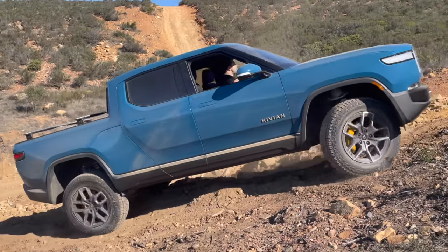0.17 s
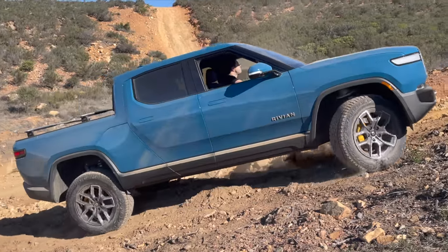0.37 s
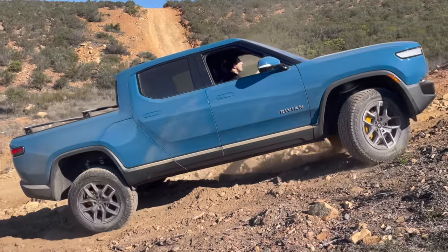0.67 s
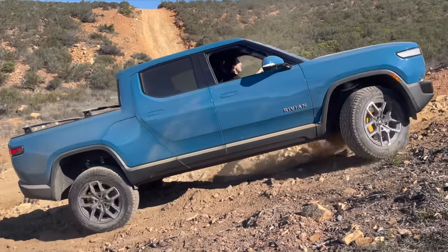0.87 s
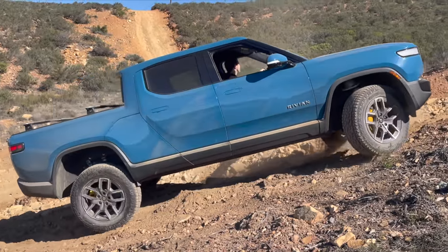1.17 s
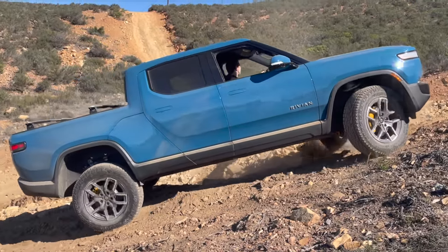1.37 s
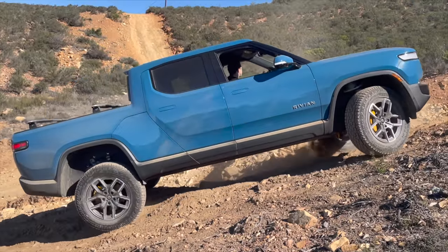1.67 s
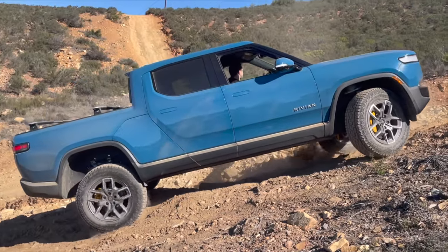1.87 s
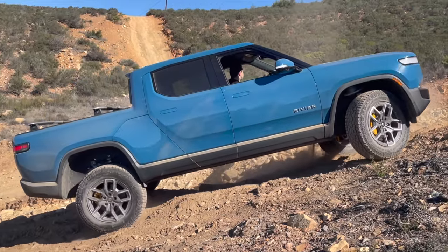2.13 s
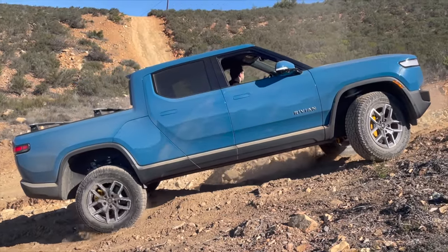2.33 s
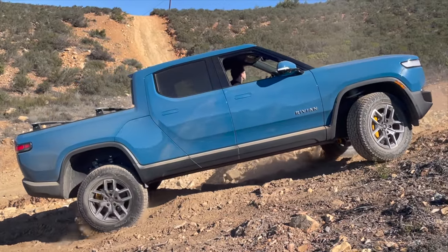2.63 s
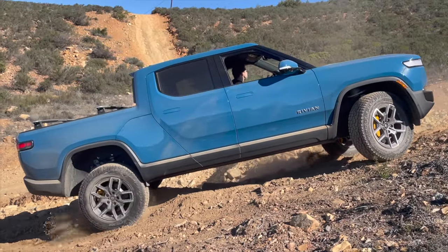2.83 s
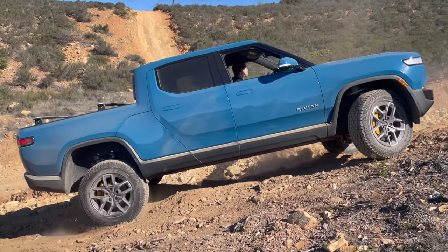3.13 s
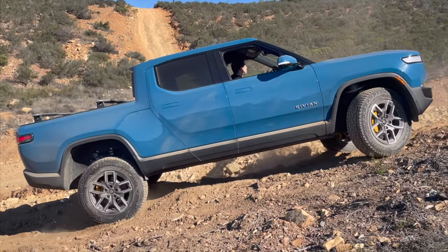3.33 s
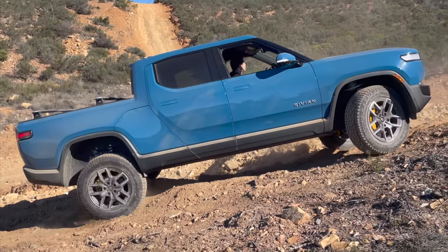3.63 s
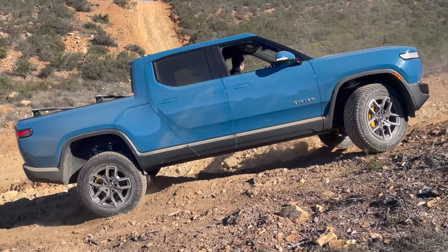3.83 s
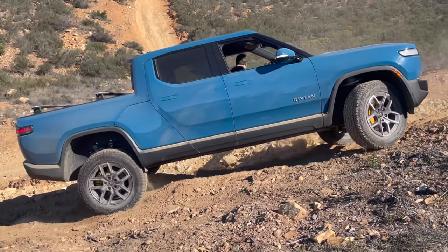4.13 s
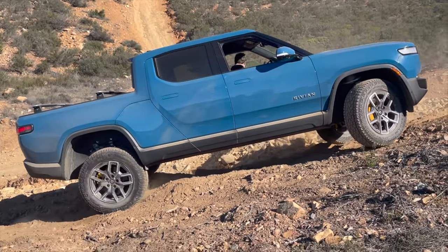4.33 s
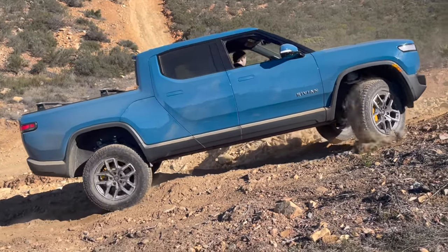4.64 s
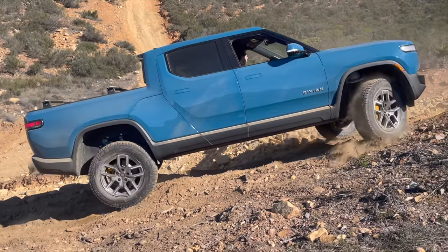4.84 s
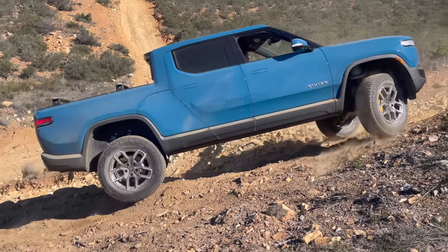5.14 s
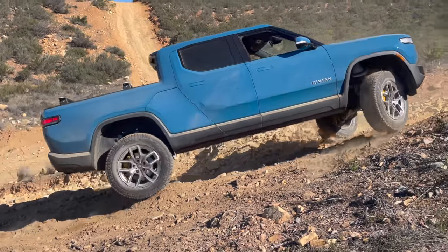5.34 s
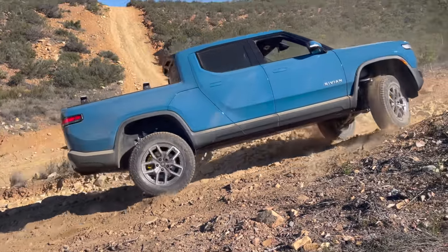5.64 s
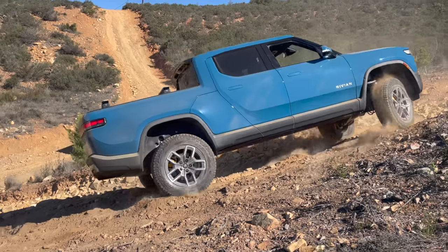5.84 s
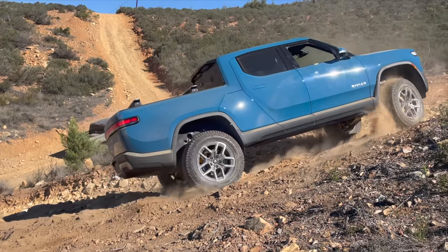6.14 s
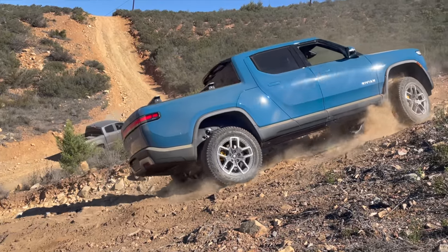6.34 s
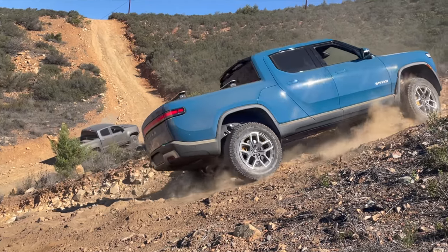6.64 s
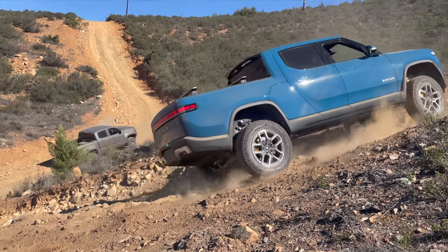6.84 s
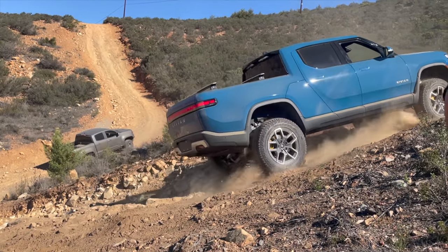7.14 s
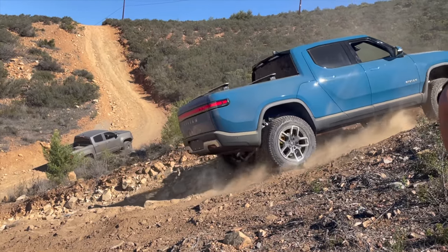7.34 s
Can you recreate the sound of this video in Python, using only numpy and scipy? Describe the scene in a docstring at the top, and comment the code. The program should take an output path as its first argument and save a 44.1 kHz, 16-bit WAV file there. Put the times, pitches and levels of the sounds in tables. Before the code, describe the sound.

An electric truck's tyres crunch and slip over loose rock in uneven surges, stones knocking and cracking above a low rumble and faint thin whine.

```python
"""On a steep trail of loose rock, an electric truck crawls past a few metres away.
In surges its tyres boom at their carcass resonance, shove stones together and grind grit: filtered
noise and streams of tiny damped contacts. Single rocks knock and crack as damped modes and pulses,
stones skid, and one hard chip pings. The motor inverters whine thinly above it: a tone and its octave."""
import sys
import numpy as np
from scipy import signal
from scipy.fft import rfft, irfft, next_fast_len
from scipy.io import wavfile
from scipy.ndimage import uniform_filter1d, map_coordinates

SR = 44100
rng = np.random.default_rng(int(sys.argv[2]) if len(sys.argv) > 2 else 0)


def wrap_up_sound(samples):
    """Save the sound to the file named by the first command line argument, as 16-bit audio."""
    columns = np.atleast_2d(samples).T
    # keep every value between -1 and 1, then stretch to whole-number steps
    tamed = np.clip(columns, -1, 1)
    steps = np.round(tamed * 32767).astype(np.int16)
    wavfile.write(sys.argv[1], SR, steps)


N = 330750

# the wheels slip and grip two or three times a second; levels before each layer's trim:
# start_s, hold_s, boom_db, rocks_db, gravel_db, grit_db
SURGES = [(0.158, 0.12, -33.5, -31.5, -45, -51.5), (0.53, 0.26, -36, -41.5, -46, -54),
          (1.064, 0.17, -38, -37.5, -45, -53.5), (1.705, 0.14, -36, -33.5, -39.5, -48.5),
          (2.176, 0.12, -28.5, -30.5, -38, -48.5), (2.569, 0.11, -33, -25.5, -37, -56),
          (2.964, 0.18, -30, -29.5, -40, -49.5), (3.468, 0.18, -25, -31, -37.5, -51.5),
          (3.772, 0.2, -30, -33.5, -42.5, -51.5), (4.035, 0.31, -54, -33, -43.5, -53.5),
          (4.555, 0.1, -21.5, -28, -34, -42.5), (4.71, 0.25, -44, -41.5, -49.5, -52.5),
          (5.263, 0.24, -28.5, -34.5, -42, -53.5), (5.565, 0.27, -36.5, -38.5, -45, -53.5),
          (5.974, 0.17, -28.5, -31.5, -40, -49), (6.56, 0.27, -48, -44, -55, -54),
          (6.885, 0.14, -30.5, -29, -40, -49.5), (7.094, 0.15, -34, -39, -47, -50.5),
          (7.47, 0.043, -26.5, -31, -37, -46)]
SURGE_RELEASE_S = 0.033  # the amplitude falls by a factor e


def load(pressure_db):
    """Powers of independent sources add: surges of load on a slow creep give four layer levels in dB."""
    attack_s, crest_db = 0.06, 1.5  # a surge crests halfway through its hold
    carcass_lag_s, carcass_release_s = 0.019, 0.013  # the tyres answer late
    # level at mean pressure plus dB per dB of pressure; the grit does not follow the pressure
    boom = amp(-35.5 + 1.33 * pressure_db) ** 2
    creep_rocks_db = -40 + 1.18 * pressure_db
    creep_gravel_db = -49 + 0.66 * pressure_db
    ground = amp([creep_rocks_db, creep_gravel_db, np.full(N, -55)]) ** 2
    for s, hold, boom_db, *ground_db in SURGES:
        boom += amp(boom_db) ** 2 * swell(s + carcass_lag_s, attack_s, hold, carcass_release_s, crest_db)
        surge = swell(s, attack_s, hold, SURGE_RELEASE_S, crest_db)
        ground += np.outer(amp(ground_db) ** 2, surge)
    uneven_db = 1.47 * wobble(rate=30)  # the stony ground makes the load waver
    return 10 * np.log10([boom, *ground]) + uneven_db


def tyres(boom_db):
    """Forced resonance: rough ground, as noise, shakes the tyre carcasses at their low resonance."""
    # carcass spectrum: frequency_hz, relative_db
    boom_spectrum = [(20, -51.5), (32, -21), (45, -10), (58, 2.5), (68, 3.5), (82, 4), (98, -5.5),
                     (130, -9.5), (250, -70.5)]
    return amp(boom_db - 1.0) * steady(colour(noise(side_db=-26.5), boom_spectrum), seconds=0.13)


def bounces():
    """Free resonance: a tyre that drops off a rock rings on the note of its carcass."""
    # drops: time_s, level_db
    drops = [(0.032, -26.5), (0.79, -34), (0.97, -32.5), (1.11, -27), (1.838, -24.5), (2.737, -21),
             (2.97, -26), (3.182, -21), (3.31, -27), (3.71, -19.5), (3.99, -26), (4.352, -19.5),
             (4.92, -32.5), (5.42, -22), (6.1, -25), (6.223, -25), (6.5, -31.5), (6.965, -25.5),
             (7.015, -19.5)]
    carcass_hz, attack_s, release_s = 69.56, 0.024, 0.041
    t = np.arange(N) / SR
    track = np.zeros(N)
    for s, db in drops:
        envelope = np.sqrt(2 * swell(s, attack_s, 0, release_s))  # 2: the level is an rms value
        hz = carcass_hz * (1 + .05 * rng.normal())
        track += amp(db) * envelope * np.sin(2 * np.pi * hz * t)
    return track


def rocks(rocks_db):
    """Damped contact: buried rocks shift under the tread with dull bumps, among the noise of the soil."""
    # spectrum of the buried rocks: frequency_hz, relative_db
    rock_spectrum = [(60, -52.5), (90, 3), (112, 2.5), (145, -1), (190, 1), (255, -2.5), (310, -6.5),
                     (380, -4.5), (500, -12.5), (700, -28.5), (1100, -20), (2500, -64)]
    bumps = contacts(count=3333, spread_db=1.9, width_db=4, lo_hz=100, hi_hz=800, cycles=6, size=1500)
    soil = amp(-3) * noise(side_db=-15)
    return amp(rocks_db) * steady(colour(bumps + soil, rock_spectrum), seconds=0.065)


def gravel(gravel_db):
    """Granular friction: pebbles grind together; under more load small ones add a brighter rasp."""
    # crunch of the larger stones: frequency_hz, relative_db
    crunch_spectrum = [(250, -7), (550, 0.5), (780, 0.5), (970, 4.5), (1250, -6), (1550, -7.5), (1850, -32),
                       (2500, -29), (4000, -30), (7000, -49), (14000, -49)]
    # small pebbles slipping: frequency_hz, relative_db
    pebble_spectrum = [(600, -39.5), (1200, 16), (1600, -11), (2500, -1), (3400, -16), (5000, -4),
                       (8000, -13), (14000, -36)]
    clusters = collapses(count=700)
    clacks = contacts(count=10000, spread_db=3.0, width_db=8, lo_hz=500, hi_hz=2200, cycles=6, size=500)
    grains = clacks + amp(-5) * noise(side_db=-10)
    crunch = steady(colour(clusters * grains, crunch_spectrum), seconds=.09)
    slips = contacts(count=8250, spread_db=3.6, width_db=8, lo_hz=1300, hi_hz=4500, cycles=13, size=350)
    rasp = steady(colour(clusters * slips, pebble_spectrum), seconds=0.47)
    overload_db = gravel_db - np.mean(gravel_db)
    rasp_db = gravel_db - 14.0 + 0.024 * overload_db  # grows a little faster than the crunch
    return amp(gravel_db - 1.5) * crunch + amp(rasp_db) * rasp


def collapses(count):
    """Relaxation: gain of a gravel bed that gives way in clusters, each sudden and then dying away."""
    settle_s, spread_db, even_share = .005, 2.4, .4  # even_share: steady part of the grinding power
    when, force = rng.random((count, 2)).T
    power = np.bincount((when * N).astype(int), amp(spread_db * rare_strength(force)) ** 2, N)
    power = signal.lfilter([1], [1, -np.exp(-1 / (settle_s * SR))], power)
    return np.sqrt(even_share + (1 - even_share) * power / np.mean(power))


def grit(grit_db):
    """Broadband friction: sand hisses under the rubber, and tiny chips tick in it."""
    # spectrum of the spray: frequency_hz, relative_db
    grit_spectrum = [(700, 5), (1600, 5.5), (2500, 1), (4000, -4.5), (5500, -7), (7200, -9.5), (8300, -20),
                     (9800, -8.5), (12500, -20), (14200, -15.5), (16000, -21)]
    ticks = contacts(count=6000, spread_db=4.6, width_db=8, lo_hz=2000, hi_hz=9000, cycles=9, size=200)
    sand = noise(side_db=-12) * amp(1.5 * wobble(30))
    spray = sand + amp(-6) * ticks
    return amp(grit_db - 0.5) * unit(colour(spray, grit_spectrum))


def knocks():
    """Modal impact: a tipping rock clacks at its pitch and thuds into damping soil; crumbs scatter."""
    # rocks tipping under a tyre, levels before trim: time_s, thud_db, thud_hz, clack_db, clack_hz
    tipping_rocks = [(0.166, -28, 409, -28, 630), (0.251, -26, 388, -42, 900), (0.326, -30, 328, -29, 700),
                     (0.631, -34, 600, -26, 1076), (0.638, -32, 480, -29, 840), (0.788, -42, 300, -32, 915),
                     (1.063, -23, 431, -27, 770), (1.221, -22, 339, -46, 900), (1.265, -26, 300, -44, 900),
                     (1.391, -42, 300, -33, 750), (1.526, -34, 700, -22, 900), (1.533, -29, 280, -38, 760),
                     (1.714, -38, 300, -29, 775), (1.741, -24, 258, -38, 900), (1.994, -16, 425, -28, 990),
                     (2.006, -22, 345, -43, 900), (2.074, -24, 247, -35, 620), (2.101, -36, 291, -27, 860),
                     (2.137, -36, 300, -25, 830), (2.268, -23, 215, -27, 660), (2.439, -40, 300, -30, 890),
                     (2.47, -25, 253, -40, 900), (2.527, -36, 300, -28, 980), (2.588, -20, 242, -34, 900),
                     (2.62, -21, 236, -34, 900), (2.634, -22, 260, -32, 900), (2.655, -21, 215, -40, 900),
                     (2.672, -20, 400, -26, 850), (2.685, -22, 215, -40, 620), (2.857, -23, 231, -40, 900),
                     (3.047, -22, 334, -22, 1150), (3.058, -17, 226, -32, 900), (3.074, -18, 226, -36, 900),
                     (3.104, -22, 215, -38, 900), (3.233, -21, 355, -35, 900), (3.346, -23, 345, -36, 620),
                     (3.441, -32, 280, -27, 900), (3.451, -24, 260, -23, 936), (3.501, -23, 240, -22, 936),
                     (3.515, -20, 236, -36, 900), (3.53, -21, 204, -24, 850), (3.539, -27, 328, -19.5, 990),
                     (3.701, -32, 280, -25, 1010), (3.776, -28, 587, -21, 800), (3.793, -34, 300, -27, 830),
                     (3.811, -23, 247, -36, 900), (3.855, -18, 230, -15.5, 968),
                     (3.875, -18, 258, -40, 900), (3.909, -35, 565, -22, 820), (3.918, -32, 260, -23, 1010),
                     (3.961, -25, 554, -18, 968), (4.045, -26, 269, -25, 936), (4.109, -22, 236, -38, 900),
                     (4.124, -33, 280, -26, 958), (4.21, -30, 240, -28, 1010), (4.307, -29, 205, -25, 850),
                     (4.511, -30, 250, -28, 1000), (4.532, -32, 300, -24, 1000),
                     (4.573, -21, 279, -25, 950), (4.589, -14, 230, -32, 900), (4.619, -21, 199, -17, 958),
                     (4.642, -24, 260, -26, 1100), (4.688, -21, 221, -36, 900), (4.834, -18, 340, -36, 900),
                     (4.865, -38, 300, -28, 753), (5.179, -45, 300, -34, 936), (5.221, -38, 300, -28, 947),
                     (5.326, -30, 260, -28, 818), (5.454, -25, 296, -21, 1300), (5.465, -24, 240, -29, 936),
                     (5.588, -36, 300, -28, 872), (5.602, -18, 210, -38, 900), (5.775, -33, 226, -25, 807),
                     (5.952, -22, 366, -38, 900), (6.038, -24, 361, -37, 900), (6.073, -20, 330, -30, 900),
                     (6.128, -32, 260, -28, 904), (6.415, -45, 344, -33, 1400), (6.427, -29, 344, -44, 900),
                     (6.57, -29, 366, -37, 690), (6.615, -35, 420, -29, 1012), (6.723, -25, 400, -27, 807),
                     (6.865, -26, 409, -30, 624), (6.897, -24, 474, -32, 1000),
                     (6.903, -34, 400, -26, 1440), (6.938, -24, 431, -36, 900), (6.975, -18, 460, -24, 650),
                     (6.993, -16, 237, -22, 800), (7.129, -30, 595, -28, 700), (7.308, -28, 395, -38, 764),
                     (7.327, -31, 204, -46, 900), (7.44, -21, 345, -23, 979), (7.472, -22, 409, -34, 900)]
    # modes of a rock: pitch_multiple, relative_db, t60_s
    stone_modes = [(.72, -7, 0.011), (1, 0, 0.022), (1.33, -12, 0.009), (2.2, -12, 0.006)]
    # contact and crumbs: frequency_hz, relative_db
    clack_spectrum = [(150, -16), (500, -4), (750, -1), (980, 0), (1300, -5), (1900, -11), (2600, -13),
                      (3600, -25), (8000, -50)]
    thud_trim_db, clack_trim_db, contact_trim_db, crumbs_trim_db = 0.5, -3, 11, -15
    rings, crumbs = np.zeros((2, 2, N))
    t = np.arange(SR // 10) / SR
    for s, thud_db, thud_hz, clack_db, clack_hz in tipping_rocks:
        damping = amp(-60 * thud_hz * t / 12)  # 60 dB in 12 cycles
        thud = np.sin(2 * np.pi * thud_hz * t) * damping * (1 - np.exp(-(t / .0007) ** 2))
        clack = np.zeros(len(t))
        for multiple, level_db, t60 in stone_modes:
            mode_hz = clack_hz * multiple * (1 + .025 * rng.normal())
            clack += amp(level_db - 60 * t / t60) * np.sin(2 * np.pi * mode_hz * t)
        clack *= 1 - np.exp(-t / .0003)
        contact = signal.unit_impulse(len(t))
        scatter = noise(side_db=1, size=len(t)) * amp(-60 * t / 0.037)
        add(rings, s - .001, amp(thud_db + thud_trim_db) * thud)
        add(rings, s, amp(clack_db + clack_trim_db) * clack)
        add(crumbs, s, amp(clack_db + contact_trim_db) * contact)
        add(crumbs, s, amp(clack_db + crumbs_trim_db) * scatter)
    return rings + colour(crumbs, clack_spectrum)


def cracks():
    """Brittle fracture: a pinched stone breaks in a pulse and a burst of fragments with a short tail."""
    # snapping stones, levels before trim: time_s, snap_db, splinter_db (added to snap_db), t60_s
    snapping_stones = [(0.4713, -24, -4.5, 0.0057), (0.5282, -19.5, -10, 0.004), (0.5324, -31, -3, 0.0099),
                       (0.5384, -30, 0, 0.0019), (0.5484, -28, -15, .012), (0.5731, -24, -16, 0.0045),
                       (0.592, -28, -16, .012), (0.6282, -13, -3.5, 0.0042), (0.668, -37, -22, .008),
                       (0.6978, -26.5, -3.5, 0.0037), (0.7846, -29, -39, 0.02), (0.832, -32, -30, 0.005),
                       (1.1044, -31.5, -3.5, 0.016), (1.196, -35, -10, .015), (1.288, -28, -15, 0.03),
                       (1.3423, -30.5, -3, 0.053), (1.3795, -37, -16, .006), (1.5245, -30, -35, 0.012),
                       (1.6974, -31.5, -8, 0.0079), (1.9021, -31, -33, 0.0036), (2.0695, -35, -25, .004),
                       (2.136, -29, -21, 0.015), (2.2334, -32, -20, .005), (2.3273, -34, -16, .004),
                       (2.3431, -28.5, -13, 0.0046), (2.3574, -33, -3, 0.0036), (2.3655, -28, -8, .005),
                       (2.4655, -34, -22, .004), (2.4885, -33, -4, 0.005), (3.0939, -32, -15, 0.0028),
                       (3.1472, -31, -14, 0.004), (3.7744, -31.5, -9, .005), (3.7923, -30, -10, .004),
                       (3.8541, -30, -16, 0.0045), (3.908, -30, -25, 0.0036), (3.9598, -31, -20, 0.004),
                       (4.1604, -38, 3.5, 0.0058), (4.4667, -28, -11, 0.01), (4.5015, -32, -22, .006),
                       (4.5105, -30, -22, .006), (4.5306, -19, -14, 0.006), (4.5734, -23, -7.5, 0.0027),
                       (4.6414, -29, -4, .005), (4.8145, -23.5, -10.5, 0.0018), (4.9511, -31, -18, 0.005),
                       (5.0988, -29.5, -10, 0.0042), (5.1878, -31, -8, 0.0037), (5.215, -26, -1.5, 0.0019),
                       (5.248, -28, -21, 0.0058), (5.3522, -30, -12, 0.004), (5.4343, -31, -28, .004),
                       (5.451, -24, -24, .004), (5.4538, -17.5, -28, 0.012), (5.4753, -30, -20, .004),
                       (5.5218, -21.5, -31, 0.0026), (5.5334, -29, -14, 0.006), (5.5687, -31, -16, 0.006),
                       (5.671, -34.5, -11, .008), (6.0893, -30, -30, .015), (6.2198, -35, -9, 0.0064),
                       (6.4138, -35, -35, 0.008), (6.6405, -35, -31, .005), (6.7221, -35, 0, .008),
                       (6.9915, -27, -32, .007)]
    # body of a snap: frequency_hz, relative_db
    snap_spectrum = [(200, -6), (700, 7), (1400, 3.5), (2700, 5), (4200, 1.5), (6000, -1), (8500, -9),
                     (16000, -63)]
    # its treble: frequency_hz, relative_db
    splinter_spectrum = [(1500, -101), (4500, -103), (7000, 21), (8400, 37.5), (10000, 32.5), (12500, 25),
                         (16000, 28)]
    fracture_share, fracture_s = 0.58, 0.0068  # the clean break loses energy share as snaps lengthen
    snaps, splinters = np.zeros((2, 2, N))
    t = np.arange(SR // 10) / SR
    tail = amp(-15 - 60 * t / .05)  # scattered by the ground
    for s, snap_db, splinter_db, t60 in list(snapping_stones) + chips(count=2):
        clean = np.clip(fracture_share * np.exp(-t60 / fracture_s), 0, 1)
        pan_db = np.array([[1], [-1]]) * rng.uniform(-0.62, 1)
        pulse = unit(signal.unit_impulse(len(t))) * amp(pan_db)
        fragments = unit(noise(side_db=-19, size=len(t)) * (amp(-60 * t / t60) + tail))
        burst = np.sqrt(clean) * pulse + np.sqrt(1 - clean) * fragments
        add(snaps, s + 0.0014, amp(snap_db - 27.5) * burst)
        add(splinters, s + 0.0012, amp(snap_db + splinter_db - 22.5) * burst)
    return colour(snaps, snap_spectrum) + colour(splinters, splinter_spectrum)


def chips(count):
    """Random fracture under load: faint snaps during each surge, as rows for cracks()."""
    middle_db, spread_db, splinter_db, t60 = -40, 4, -18, .004
    rows = []
    for s, hold, *_ in SURGES:
        for place, force in rng.random((count, 2)):
            when = s + place * (hold + 2 * SURGE_RELEASE_S)
            rows.append((when, middle_db + spread_db * (2 * force - 1), splinter_db, t60))
    return rows


def scrapes():
    """Stick-slip: a stone skidding under the tread moves in irregular jerks that excite its resonance."""
    # skids: start_s, level_db, length_s, pitch_hz, width_hz
    skids = [(0.155, -37.5, 0.088, 370, 380), (0.573, -41, 0.034, 790, 500),
             (1.074, -43.5, 0.026, 2520, 400), (1.093, -46.5, 0.02, 3150, 1800),
             (1.105, -46, 0.025, 2650, 600), (1.16, -36.5, 0.074, 394, 500), (2.575, -54, 0.07, 2500, 1800),
             (2.605, -35, 0.036, 380, 340), (3.026, -49, 0.029, 2500, 1500),
             (3.762, -44, 0.0098, 2030, 500), (4.071, -49.5, 0.14, 4870, 2970),
             (4.536, -55, 0.016, 3000, 2200), (4.555, -44, 0.029, 3200, 3030),
             (4.616, -50.5, 0.038, 2390, 2000), (5.45, -30, 0.012, 2000, 2290),
             (5.949, -46, 0.059, 1960, 1490), (6.066, -44, 0.025, 1940, 1250),
             (6.593, -45.5, 0.054, 1210, 700), (6.864, -37.5, 0.049, 960, 950),
             (6.95, -32.5, 0.036, 250, 254), (6.969, -41.5, 0.035, 2200, 1750),
             (7.474, -46, 0.026, 3880, 1400)]
    track = np.zeros((2, N))
    for s, db, length, hz, width_hz in skids:
        jerks = rng.standard_normal(int(length * SR)) ** 3  # cubing makes the strong ones stand out
        band = [max(hz - width_hz / 2, hz / 4), hz + width_hz / 2]
        stone = signal.butter(2, band, "bandpass", fs=SR)
        skid = unit(signal.lfilter(*stone, jerks))
        add(track, s, amp(db) * skid * np.hanning(len(jerks)) ** .5)
    return track


def pings():
    """Free vibration: a hard chip rings briefly on one lightly damped mode."""
    # ringing chips: time_s, level_db, pitch_hz, t60_s
    ringing_chips = [(4.816, -25, 11930, 0.0083)]
    track, t = np.zeros((2, N)), np.arange(SR // 10) / SR
    for s, db, hz, t60 in ringing_chips:
        add(track, s, amp(db) * np.sin(2 * np.pi * hz * t) * amp(-60 * t / t60))
    return track


def inverters():
    """Switching harmonics: the tone swells with motor torque, its octave comes and goes; both flutter."""
    # pushes of the motors: start_s, hold_s, tone_db
    torque = [(0.08, 0.018, -51.5), (0.14, .025, -57), (0.21, 0.018, -59), (0.367, 0.025, -59),
              (0.432, .025, -55), (0.504, .03, -56), (0.665, 0.043, -56.5), (0.752, .07, -63),
              (0.89, 0.23, -61.5), (1.23, 0.12, -70), (1.514, 0.052, -61), (1.707, 0.48, -67),
              (2.114, .19, -63), (2.55, 0.12, -68), (2.887, 0.12, -59), (3.07, 0.07, -77),
              (3.617, 0.09, -66), (3.98, 0.36, -66.5), (4.456, 0.093, -55.5), (4.69, 0.048, -54),
              (4.753, 0.031, -56), (4.85, 0.1, -65), (4.94, 0.23, -56.5), (5.29, 0.062, -67),
              (5.43, 0.073, -57), (5.58, .04, -64), (6.007, 0.039, -63), (6.143, 0.2, -63),
              (6.58, 0.11, -61.5), (6.716, 0.035, -53), (6.83, 0.07, -63), (6.983, 0.14, -57.5),
              (7.21, .04, -61), (7.38, 0.088, -55.5)]
    # level of the octave: time_s, level_db
    octave_levels = [(0, -70), (1.6, -98), (1.75, -85), (2.0, -88), (2.55, -64.5), (2.65, -75), (3.08, -65),
                     (3.25, -85), (3.42, -88), (3.62, -67.5), (3.98, -75), (4.2, -67), (4.47, -72),
                     (4.65, -66), (5.12, -73), (5.22, -71), (5.38, -68), (5.7, -85), (6.6, -93),
                     (7.12, -68), (7.5, -70)]
    switching_hz, idle_db = 4993, -67  # idle_db: the tone between pushes
    attack_s = release_s = 0.012
    power = amp(idle_db) ** 2
    for s, hold, db in torque:
        power = power + amp(db) ** 2 * swell(s, attack_s, hold, release_s)
    # the motors ease off and the whine dips by 12 dB
    easing = amp(-12 * swell(6.365, attack_s, .18, release_s))
    octave_db, = curves(octave_levels)
    phase = 2 * np.pi * switching_hz * np.arange(N) / SR
    flutter_db = 2.2 * wobble(50) + 1.2 * wobble(18)
    tone = unit(np.sin(phase + .8 * wobble(36)) * amp(flutter_db))
    octave = unit(np.sin(2 * phase + 1.2 * wobble(40)) * amp(1.5 * wobble(60)))
    sided_tone = tone * amp([[1], [-1.5]])  # dB at left and right
    return easing * (np.sqrt(power) * sided_tone + amp(octave_db) * octave)


def echoed(x):
    """Specular reflection: the truck's flank throws each blow back, later and weaker."""
    echo_s, echo_db = 0.0081, -18.5
    return x + amp(echo_db) * np.pad(x, ((0, 0), (round(echo_s * SR), 0)))[:, :N]


def contacts(count, spread_db, width_db, lo_hz, hi_hz, cycles, size):
    """Shot noise of damped contacts: each has its pitch, force and place, and dies in a few cycles."""
    when, pitch, force, place = rng.random((count, 4)).T
    hz = (lo_hz * (hi_hz / lo_hz) ** pitch)[:, None]
    turns = hz * np.arange(size) / SR
    strength = amp(spread_db * rare_strength(force)) * (-1) ** np.arange(count)
    decay = np.exp(-np.log(1000) * turns / cycles)  # 60 dB in the given cycles
    grains = strength[:, None] * hz * np.sin(2 * np.pi * turns) * decay
    index = ((when * N).astype(int)[:, None] + np.arange(size)).ravel()
    pan_db = width_db * (place[:, None] - .5)
    ears = [np.bincount(index, (grains * amp(ear * pan_db)).ravel(), N)[:N] for ear in (1, -1)]
    return unit(np.array(ears))


def rare_strength(force):
    """Exponential statistics: uniform draws become mostly weak, rarely strong events, capped at log 20."""
    return np.minimum(-np.log(1 - force), np.log(20))


def swell(s, attack, hold, release, crest_db=0):
    """Exponential growth and decay: power rises up to time s, holds with a crest halfway, dies away."""
    first, last = np.clip(np.array([s - 10 * attack, s + hold + 10 * release]) * SR, 0, N).astype(int)
    t = np.arange(first, last) / SR - s
    edges = np.maximum(-t, 0) / attack + np.maximum(t - hold, 0) / release
    arch = np.sin(np.pi * np.clip(t / max(hold, 1 / SR), 0, 1)) - 2 / np.pi
    return np.pad((np.exp(-edges) * amp(crest_db * arch)) ** 2, (first, N - last))


def steady(x, seconds):
    """Level normalisation: even out slow swells by the running power, so that the load sets the level."""
    power = uniform_filter1d(np.mean(x ** 2, axis=0), int(seconds * SR) + 1)
    return x / np.sqrt(np.abs(power) + 1e-9)


def colour(x, spectrum, size=8192):
    """Minimum-phase filtering: a causal response of energy 1 with the shape of a spectrum."""
    cepstrum = irfft(np.log(amp(along(spectrum, np.fft.rfftfreq(size, 1 / SR)))))
    cepstrum[1:size // 2] *= 2  # folding the cepstrum makes the response causal
    cepstrum[size // 2 + 1:] = 0
    response = irfft(np.exp(rfft(cepstrum)))
    return signal.fftconvolve(x, response[None] / np.linalg.norm(response), axes=1)[:, :N]


def noise(side_db, size=N):
    """Partial coherence: white stereo noise whose side part lies side_db from the common part."""
    mid, side = rng.standard_normal((2, size))
    return unit(mid + amp(side_db) * np.array([side, -side]))


def wobble(rate):
    """Band-limited fluctuation: a smooth random curve with rate knots a second."""
    knots = rng.standard_normal(int(N * rate / SR) + 4)
    return map_coordinates(knots, [np.arange(N) * rate / SR])


def curves(rows):
    """Linear interpolation in time: one value per sample for each column after the time."""
    s, *cols = np.transpose(rows)
    return [np.interp(np.arange(N) / SR, s, c) for c in cols]


def along(points, hz):
    """Logarithmic frequency scale: (Hz, value) points interpolated on it."""
    f, v = np.transpose(points)
    return np.interp(np.log(hz + 1), np.log(f + 1), v)


def add(track, s, sound):
    """Superposition: mix a sound into a stereo track at time s."""
    part = track[:, max(round(s * SR), 0):][:, :sound.shape[-1]]
    part += sound[..., :part.shape[1]]


def amp(db):
    """Decibel law: level in dB to amplitude gain."""
    return 10 ** (np.asarray(db) / 20)


def unit(x):
    """Root mean square: scale to rms 1."""
    return x / np.sqrt(np.mean(x ** 2) + 1e-20)


def scene():
    """Superposition in open air of the truck and the ground beneath it."""
    # steady pressure on the ground between surges: time_s, relative_db
    creep = [(0.0, 0), (0.4, 1.5), (0.92, -2.5), (1.25, 3), (1.45, -1.5), (2.1, 4), (2.8, 2.5), (3.3, 5),
             (4.35, 3.5), (4.8, 4), (5.08, -5), (5.6, 1.5), (5.9, -2), (6.4, -0.5), (7.5, -6.5)]
    creep_db, = curves(creep)
    boom_db, rocks_db, gravel_db, grit_db = load(creep_db - np.mean(creep_db))
    rolling = tyres(boom_db) + rocks(rocks_db) + gravel(gravel_db) + grit(grit_db)
    blows = echoed(knocks() + cracks())
    return rolling + bounces() + blows + scrapes() + pings() + inverters()


def record(dry):
    """Linear filtering: two microphone ports differ in level and phase and shed deep bass and top treble."""
    # level of left over right: frequency_hz, difference_db
    port_balance = [(60, -0.5), (380, -0.5), (700, 0.1), (1290, 3), (2400, 2), (4400, 0), (8000, 1),
                    (15000, -1)]
    # phase of left over right: frequency_hz, difference_rad
    port_phase = [(300, 0), (1120, .25), (1890, -.3), (2670, .2), (6200, -.2), (6900, -.9), (7700, -2.7),
                  (8900, -3.5), (10500, -6), (12700, -6.7), (14000, -9.2), (16000, -9.8)]
    top_hz = 16300
    size = next_fast_len(N + SR // 2)
    hz = np.fft.rfftfreq(size, 1 / SR)
    ear = np.array([[.5], [-.5]])  # each port takes half of the difference
    ports = amp(ear * along(port_balance, hz)) * np.exp(1j * ear * along(port_phase, hz))
    bass_cut = amp(along([(15, -33), (30, -1), (42, -0.5)], hz))  # (Hz, dB)
    return irfft(rfft(dry, size) * ports * bass_cut * (hz < top_hz), size)[:, :N]


dry = scene()
out = record(dry)
wrap_up_sound(out)
```